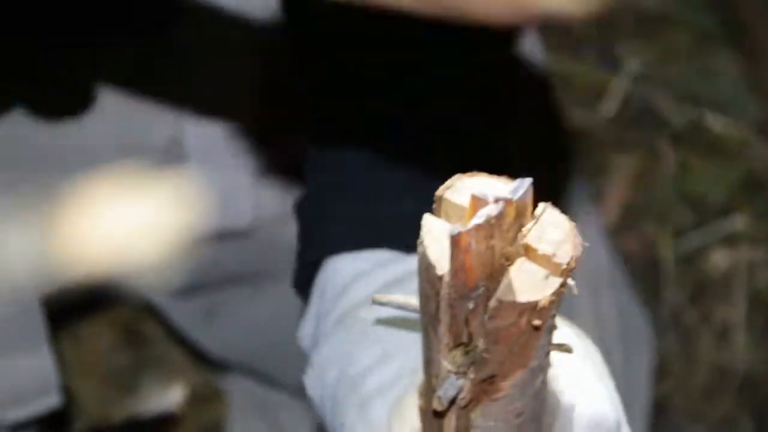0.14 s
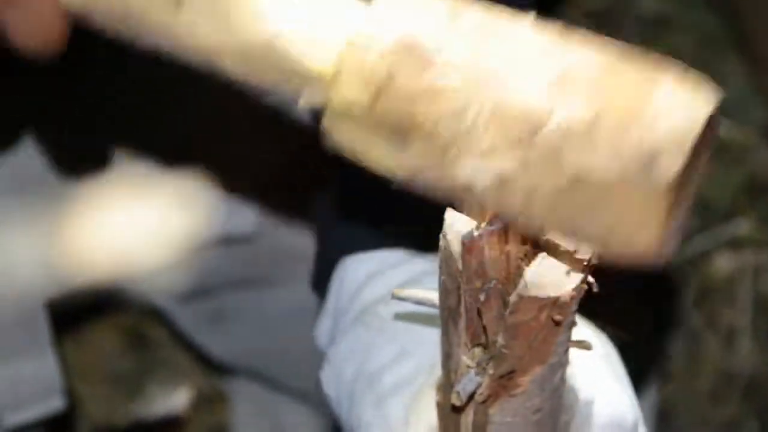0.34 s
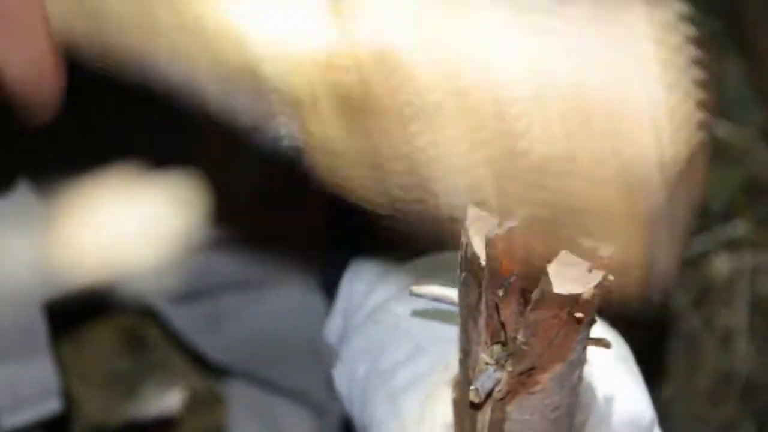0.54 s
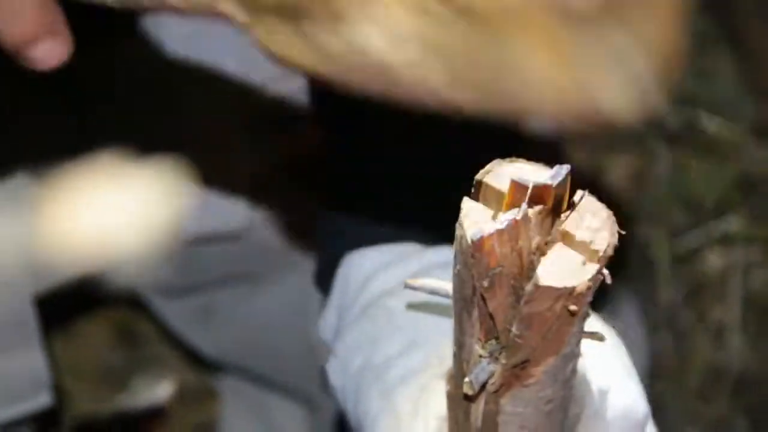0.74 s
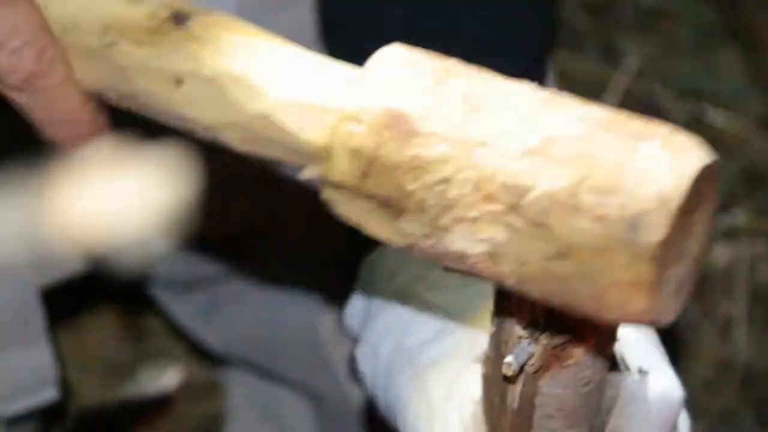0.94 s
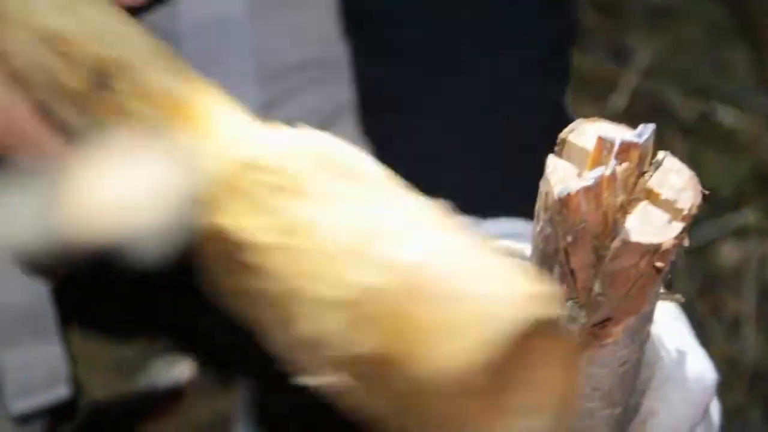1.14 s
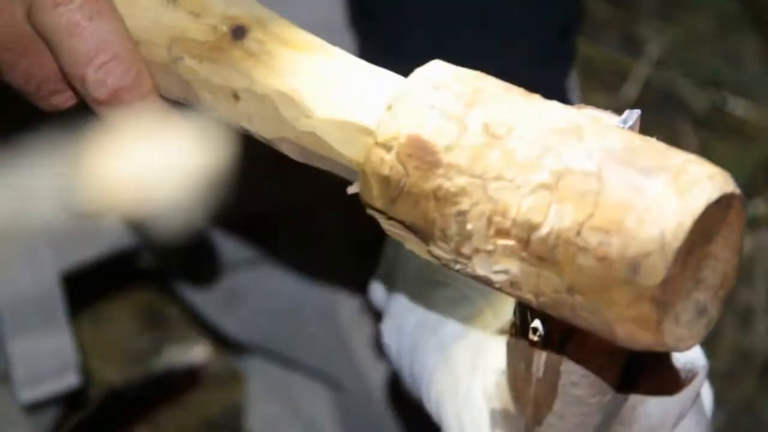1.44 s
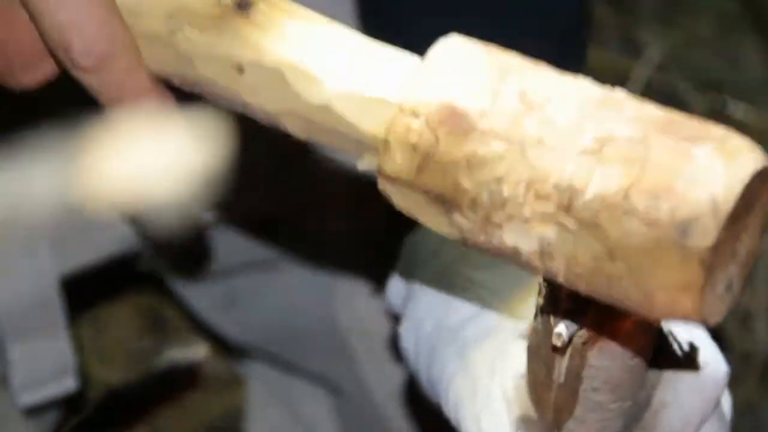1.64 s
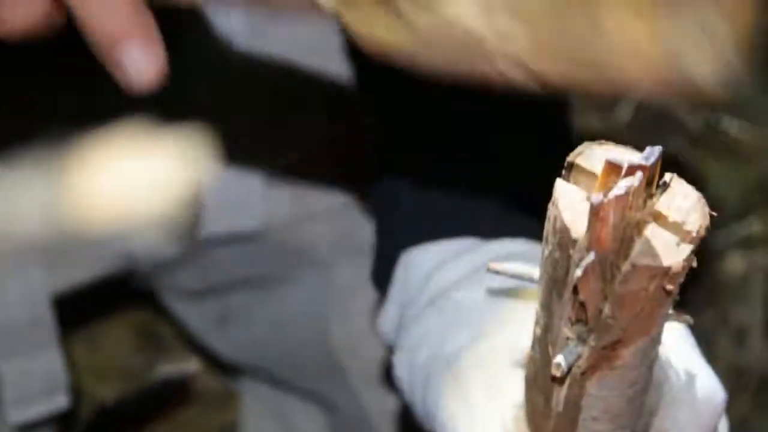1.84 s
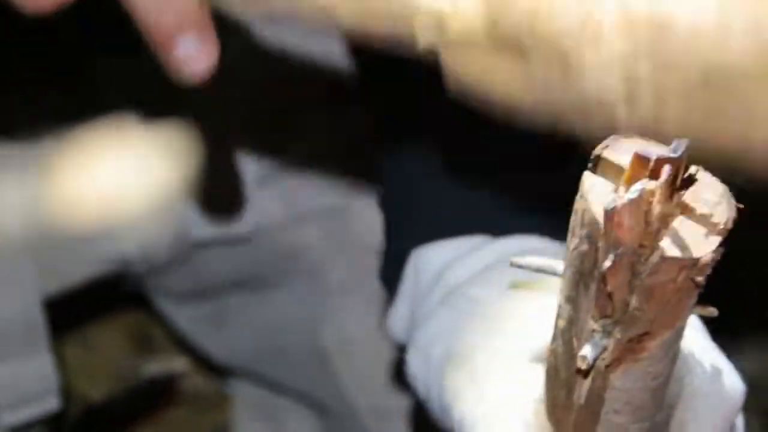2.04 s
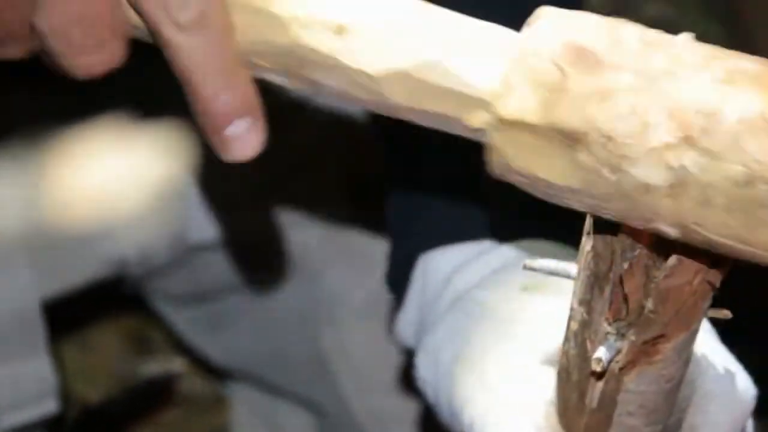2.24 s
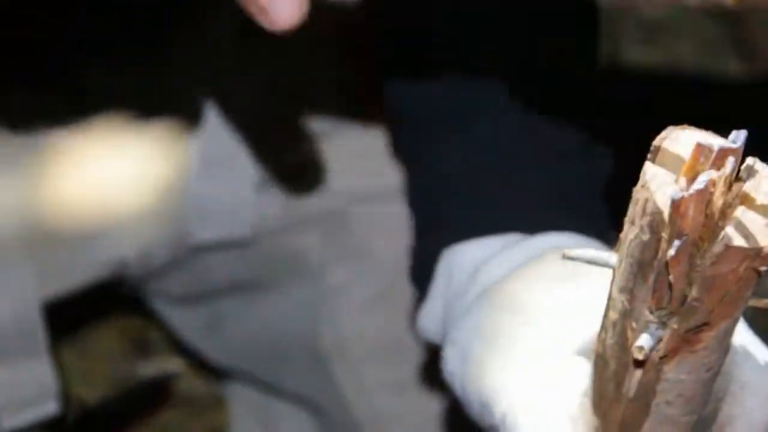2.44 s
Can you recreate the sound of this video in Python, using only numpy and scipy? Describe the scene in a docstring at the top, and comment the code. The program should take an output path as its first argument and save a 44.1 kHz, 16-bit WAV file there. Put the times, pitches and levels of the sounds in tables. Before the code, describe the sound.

A wooden mallet knocks seven times on a split stick, close by outdoors.

```python
"""Knocking on a split stick at night

A wooden baton knocks seven times on the end of a split stick held upright, outdoors and close by.
Each blow is a short push and a few milliseconds of chatter between the split halves; both make
baton and stick ring. Faint short clicks and small after-knocks sound now and then.
Ground and bushes scatter the knocks over a steady hiss."""
import sys
import numpy as np
from scipy import signal
from scipy.fft import rfft, irfft, next_fast_len
from scipy.io import wavfile

SR = 44100
rng = np.random.default_rng(int(sys.argv[2]) if len(sys.argv) > 2 else 0)


def generate_wav(sig):
    """Save sig (samples, or channels by samples) to the path in sys.argv[1] as 16-bit PCM at SR."""
    pcm = np.round(np.clip(np.atleast_2d(sig).T, -1, 1) * 32767).astype(np.int16)
    wavfile.write(sys.argv[1], SR, pcm)


N = 114660  # 2.6 seconds


def amp(db):
    """Turn decibels into a number to multiply by."""
    return 10 ** (np.asarray(db) / 20)


def normalised(x):
    """Scale a sound to an average power of 1."""
    return x / np.sqrt(np.mean(x ** 2, axis=-1, keepdims=True) + 1e-20)


def curve_at(points, hz):
    """Read between rows of (Hz, value), on a log frequency scale."""
    freqs, values = np.transpose(points)
    return np.interp(np.log(hz + 1), np.log(freqs + 1), values)


def filtered(x, response):
    """Multiply each frequency f in a sound by response(f)."""
    size = next_fast_len(x.shape[-1] + 8192)
    return irfft(rfft(x, size) * response(np.fft.rfftfreq(size, 1 / SR)), size)[..., :x.shape[-1]]


def coloured(x, points):
    """Shape a sound's tone with rows of (Hz, dB)."""
    return filtered(x, lambda f: amp(curve_at(points, f)))


def resonance(f, hz, width_hz):
    """A filter that rings at hz; the narrower it is, the longer it rings."""
    return 1j * f * width_hz / (hz * hz - f * f + 1j * f * width_hz)


def add(out, start_s, x):
    """Mix x into out at a start time."""
    part = out[..., round(start_s * SR):][..., :x.shape[-1]]
    part += x[..., :part.shape[-1]]


# The tone of the hiss. Each row: frequency in Hz, relative level in dB.
HISS_TONE = [(20, -35.5), (45, -24), (68, -9), (82, 0.5), (100, -8), (180, -3.5), (370, -4.5), (700, -10),
             (1100, -10), (3000, -12), (6000, -15.5), (8800, -18), (10200, -12.5), (11500, -21),
             (16000, -27)]
# Its stereo width. Each row: frequency in Hz, level of the side against the centre in dB.
HISS_WIDTH = [(60, 5), (110, -31), (200, -7), (380, -4), (700, 2.5), (1290, 0.5), (2380, 2), (4400, 0),
              (8120, 2.5), (15000, 4.5)]


def hiss():
    """Night air and microphone hiss: left and right share most of the bass, the treble is wide."""
    noise = rng.standard_normal((2, N))
    centre = coloured(noise[0], HISS_TONE)
    side = filtered(noise[1], lambda f: amp(curve_at(HISS_TONE, f) + curve_at(HISS_WIDTH, f)))
    return amp(-66) * np.array([centre + side, centre - side]) / np.std(centre)


# The stereo width of clicks and knocks. Each row: frequency in Hz, gain of the side in dB.
STEREO_WIDTH = [(300, -29.5), (2000, -19), (5000, -8), (12000, -7.5)]


def widened(centre, twin):
    """Add a little of a similar sound on the left and subtract it on the right."""
    side = coloured(twin, STEREO_WIDTH)
    return np.array([centre + side, centre - side])


# Faint clicks and small after-knocks. Each row: start in seconds, gain in dB, pitch in Hz,
# milliseconds to fade by 20 dB.
FAINT_CLICKS = [(0.0563, -29, 1530, 1), (.5948, -48, 2700, 6.9), (.6262, -49, 2520, 7.5),
                (.689, -40, 2140, 6.1), (0.71, -53, 620, 9.4), (0.962, -42.5, 1770, 9.7),
                (0.9951, -48, 3160, 0.67), (.998, -39.5, 2120, 10.5), (1.036, -55, 5440, 5.7),
                (1.333, -45.5, 2200, 7.5), (1.3604, -57, 8050, 4.2), (2.0082, -39, 2580, 3.7),
                (2.024, -60, 2000, 6.2), (2.031, -34.5, 8500, 1.9), (2.114, -54, 7100, 2.8),
                (2.365, -47, 1500, 3.1)]


def faint_clicks():
    """Each click is a brief, fading rattle through one broad resonance."""
    out, t = np.zeros((2, N)), np.arange(SR // 20) / SR
    for start_s, db, hz, fade_ms in FAINT_CLICKS:
        rattle = rng.standard_normal((2, len(t))) * amp(-20 * t * 1000 / fade_ms)
        click = filtered(rattle, lambda f: resonance(f, hz, width_hz=hz / 1.05) ** 2)
        add(out, start_s, amp(db) * np.sqrt(12000 / hz) * widened(*click))
    return out


def baton_push(contact_age, rebound_ms):
    """The baton gives one quick down-and-up pulse, then a weaker one as it rebounds."""
    skew = np.exp(0.14 * (np.minimum(contact_age, 2) - 2))
    push = -np.sin(np.pi * contact_age) * (contact_age < 2) * skew
    return push + amp(-5) * np.roll(push, round(rebound_ms * SR / 1000))


def chatter(t, onset, hold_ms):
    """The split halves rattle together: softened noise that holds, then dies quickly."""
    fade_s, soften_hz = 0.0092, 6400
    envelope = onset * amp(-60 * np.maximum(t - hold_ms / 1000, 0) / fade_s)
    rattle = envelope * rng.standard_normal((2, len(t)))
    return filtered(rattle, lambda f: (1 + 1j * f / soften_hz) ** -2)


# The ringing tones of baton and stick, in seven groups: thud, body, low, middle, knock, high, top.
# Each tone: pitch in Hz, width in Hz, relative level in dB.
WOOD_TONES = [
    [(185, 33.3, 5.2)],
    [(343.4, 81, -0.4)],
    [(652, 220, -4.5), (917, 174, -2.5)],
    [(1400, 566, 2.9), (2050, 1200, 2)],
    [(2140, 510, 0), (2690, 340, 3.26)],
    [(3287, 310, 5), (3635, 380, 2)],
    [(4350, 160, 4.5), (4870, 520, 7), (5320, 840, 10.5), (6300, 480, 1), (7110, 1050, 2), (8900, 120, -8)],
]


def wood_ring(push, rattle, groups_db):
    """Push and chatter ring the wood; the low tones come late, as the stick drives into the fist."""
    force = push + rattle
    thump = np.roll([push, push], round(0.002 * SR), axis=1)
    tones = [(hz, width_hz, db + group_db)
             for group, group_db in zip(WOOD_TONES, groups_db) for hz, width_hz, db in group]
    ring = 0
    for k, (hz, width_hz, db) in enumerate(tones):
        tone = filtered(force if hz > 400 else thump, lambda f: resonance(f, hz, width_hz))
        gain = amp(db - 30.5 + rng.normal(0, 1.77))  # no two blows ring quite alike
        ring += (-1) ** k * gain * normalised(tone)
    return ring


# The tone of the crack. Each row: frequency in Hz, relative level in dB.
CRACK_TONE = [(3000, -19), (5000, -1.5), (8000, -6), (11000, -10.5), (13000, -12.5), (16000, -23)]


def surface_crack(t, onset):
    """The surfaces crack as they meet: bright noise that fades by 60 dB in 14 milliseconds."""
    noise = normalised(coloured(rng.standard_normal((2, len(t))), CRACK_TONE))
    return noise * onset * amp(-60 * t / 0.014)


def echo_tail(fade_times, delay_s):
    """Two unrelated trails of noise, each frequency dying at its own speed."""
    hz, t, spectrum = signal.stft(rng.standard_normal((2, SR // 3)), SR, nperseg=128)
    fade = amp(-60 * t / curve_at(fade_times, hz)[:, None])
    tail = signal.istft(spectrum * fade, SR, nperseg=128)[1]
    return np.pad(tail / np.linalg.norm(tail[0]), ((0, 0), (round(delay_s * SR), 0)))


# Echoes off the ground and the person (near) and the bushes (far).
# Each row: frequency in Hz, seconds to fade by 60 dB.
NEAR_FADE = [(150, 0.095), (1000, 0.034), (4000, 0.081), (12000, 0.046)]
FAR_FADE = [(150, 0.4), (1000, 0.89), (5000, .35), (12000, 0.13)]
# The tone of those echoes. Each row: frequency in Hz, gain in dB.
NEAR_TONE = [(300, -1.5), (1500, -3.5), (3000, 5), (6000, 2), (12000, 0)]
FAR_TONE = [(200, -14), (800, -11), (2500, -1.5), (6000, 9.5), (12000, -4)]


def with_echoes(knock, twin, near_db, far_db):
    """One knock in stereo, with its sharp front scattered by things near and far."""
    front_s = 0.0008
    front = normalised(knock * np.exp(-np.arange(len(knock)) / SR / front_s)) * np.std(knock)
    near = coloured(echo_tail(NEAR_FADE, delay_s=0.0036), NEAR_TONE)[:1]  # same in both ears
    far = coloured(echo_tail(FAR_FADE, delay_s=0.015), FAR_TONE)
    out = np.zeros((2, SR // 2))
    add(out, 0, widened(knock, twin))
    for db, tail in (near_db, near), (far_db, far):
        add(out, 0, amp(db) * signal.fftconvolve(front[None], tail, axes=1))
    return out


# The blows. Each row: start in seconds, rebound delay in milliseconds, gain in dB, contact time and
# chatter time in milliseconds, then gains in dB for chatter, crack, near echo, far echo
# and the first six groups of WOOD_TONES.
BATON_BLOWS = [(0.0585, 1.25, -12.5, 0.36, 3.4, 8, -12, -13.5, -31, -21, -18, 5.5, 2.9, -1.5, -8.5),
               (0.376, 1.22, -10.5, 0.37, 3.3, -24, -13, -12, -29, -17, -25.5, -10.5, -8, 3.5, -4.5),
               (.673, 1.08, -19, 0.95, 3.6, -16.5, -7.5, -11.5, -19, -8, -2, -11.5, 11.5, 9.2, -0.5),
               (0.9792, 2.156, -19.5, .5, 5.5, 16, -16, -18.5, -19.5, -2, 2.5, -21.5, -2, -13.5, -10.5),
               (1.3217, 1.11, -35, 0.41, 7, 18, -10.5, -17, -39, -6, 4.5, -8, 2.5, 3.6, -3),
               (2.0104, 1.98, -15, .4, 2.8, -1, -18, -10.5, -35, -12, -4.5, -8, 3, -5.5, -9),
               (2.3349, 2.21, -12.5, 0.53, 3.2, 4, -18, -14.5, -30, -1.5, 0.3, -8.5, -1.5, -1.5, -4)]


def baton_blows():
    """The baton hits the stick: push, ringing wood and crack add up to one knock."""
    out, t = np.zeros((2, N)), np.arange(SR // 10) / SR
    for (start_s, rebound_ms, db, contact_ms, chatter_ms,
         chatter_db, crack_db, near_db, far_db, *groups_db) in BATON_BLOWS:
        contact_age = t * 1000 / contact_ms  # reaches 1 after one contact time
        onset = np.minimum(contact_age, 1)
        push = baton_push(contact_age, rebound_ms)
        rattle = amp(chatter_db) * chatter(t, onset, chatter_ms)
        ring = wood_ring(push, rattle, groups_db + [crack_db])  # the top group follows the crack
        crack = amp(crack_db) * surface_crack(t, onset)
        knock, twin = amp(db) * (ring + crack + amp(-4.5) * push)
        add(out, start_s, with_echoes(knock, twin, near_db, far_db))
    bass_cut_hz = 174
    return filtered(out, lambda f: (1j * f / (bass_cut_hz + 1j * f)) ** 2)


def scene():
    """Knocks and clicks over the steady hiss."""
    return baton_blows() + faint_clicks() + hiss()


def record(dry):
    """The camera keeps nothing above 15900 Hz."""
    return filtered(dry, lambda f: f < 15900)


dry = scene()
out = record(dry)
generate_wav(out)
```